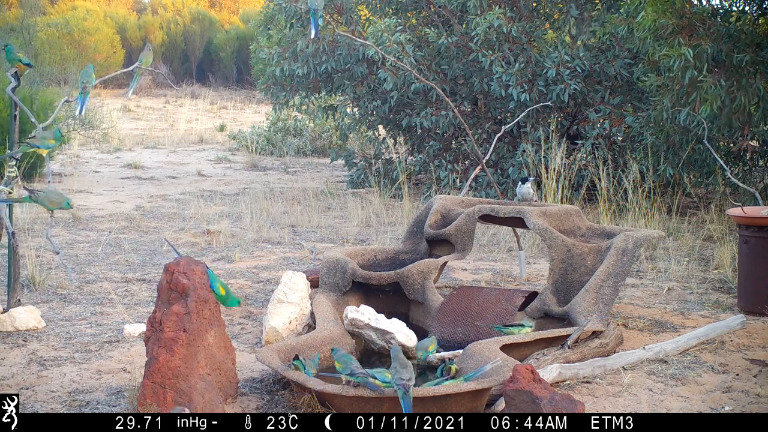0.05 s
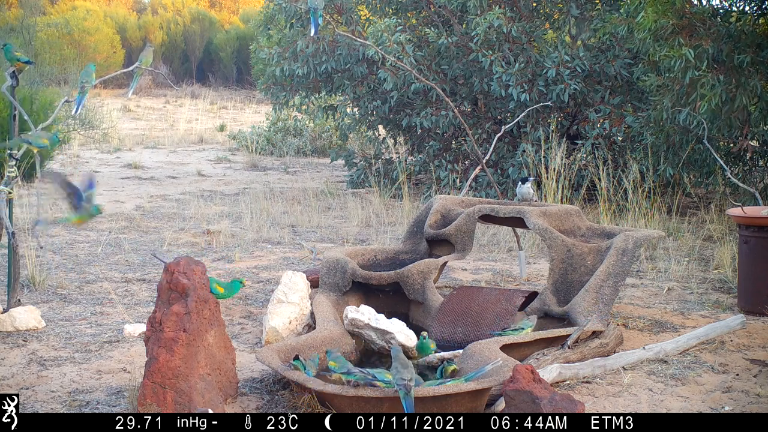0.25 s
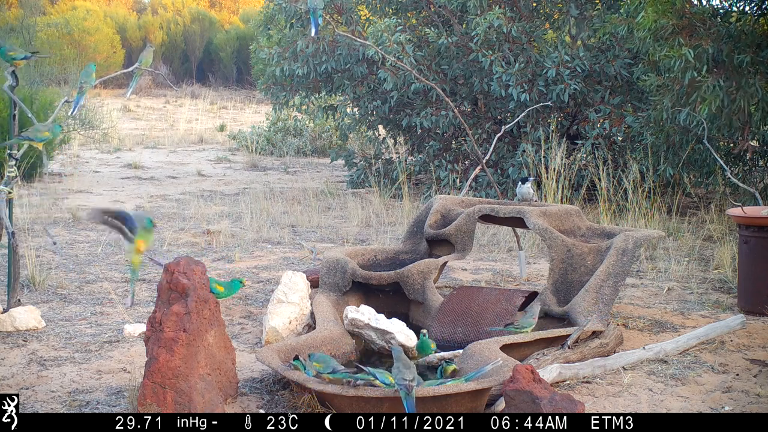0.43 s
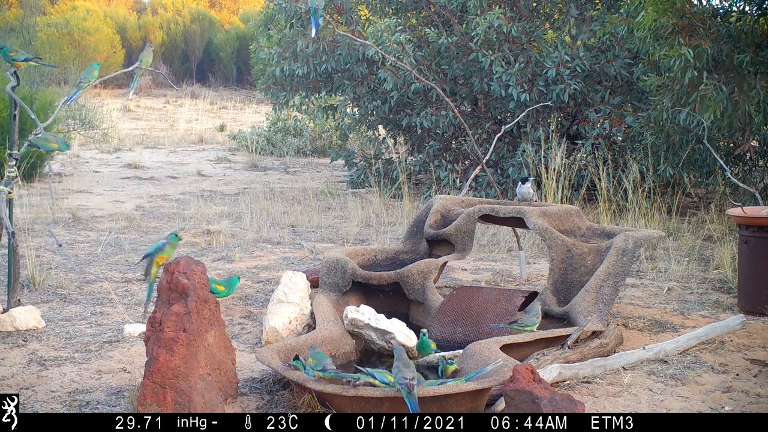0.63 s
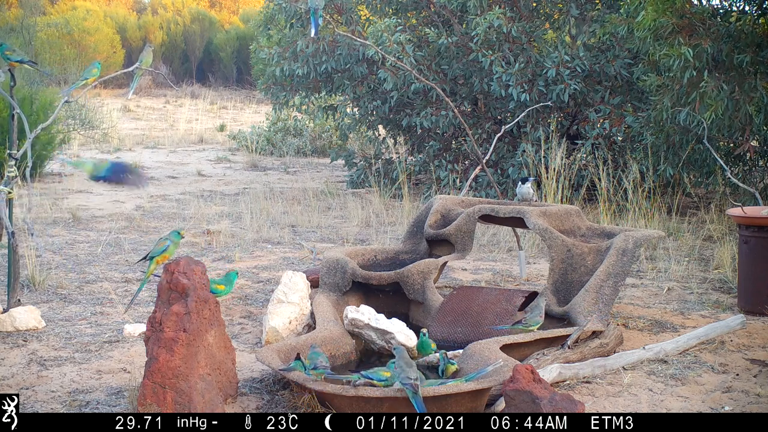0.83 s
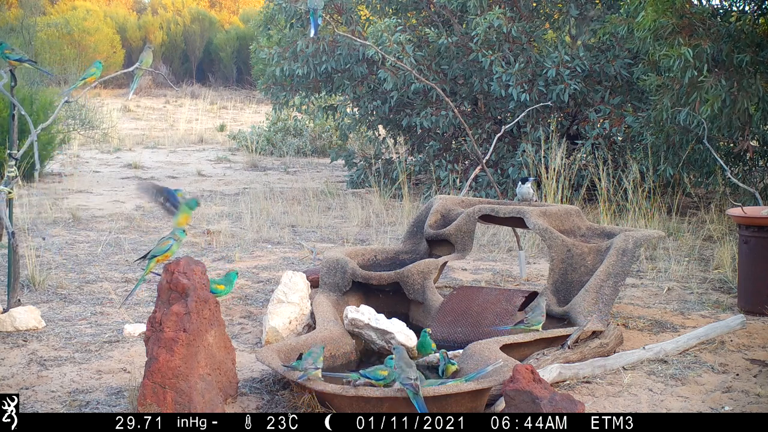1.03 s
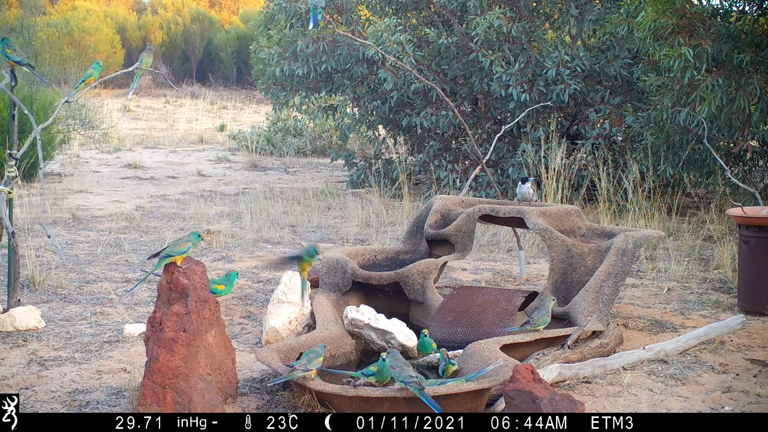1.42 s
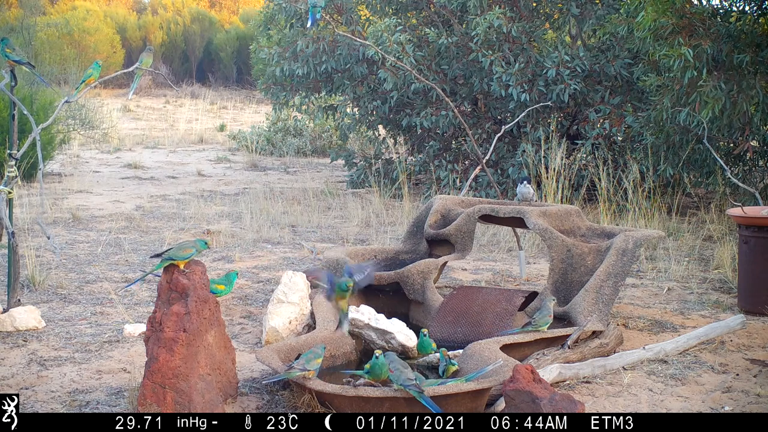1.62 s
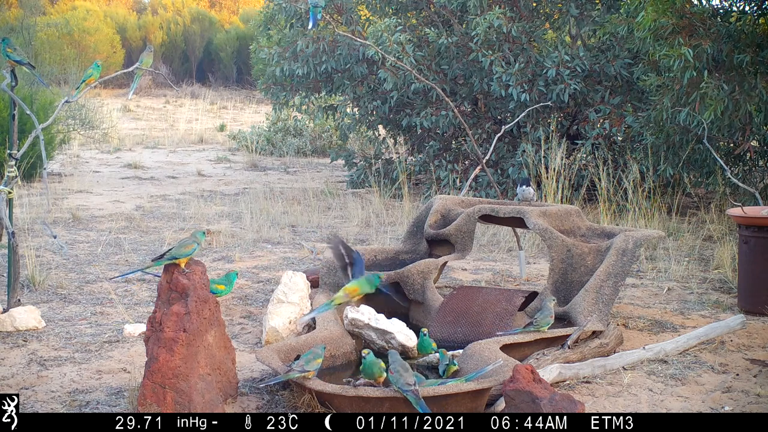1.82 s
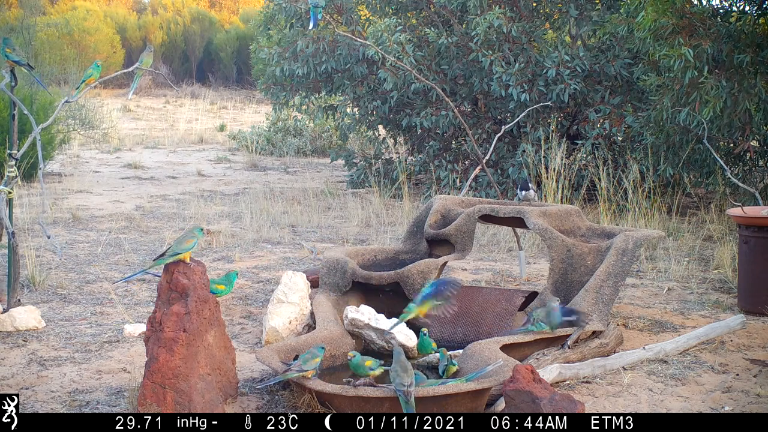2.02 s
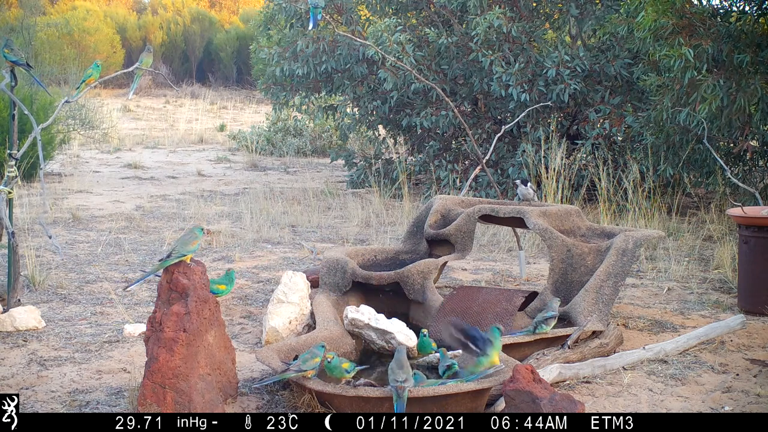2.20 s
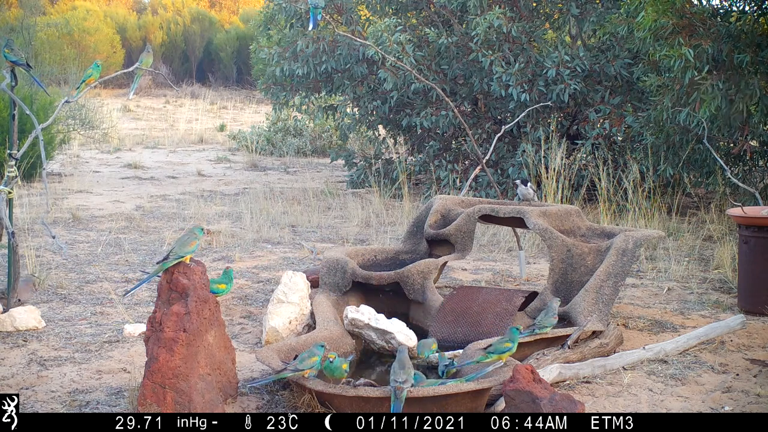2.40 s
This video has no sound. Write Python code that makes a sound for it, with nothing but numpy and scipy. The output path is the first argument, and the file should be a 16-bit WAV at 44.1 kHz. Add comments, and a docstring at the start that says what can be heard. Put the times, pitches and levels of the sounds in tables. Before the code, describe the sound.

One short, clear warbling bird whistle over small birds' soft chirps, taps and wing flutters.

```python
"""Soft open air and a camera's thin electronic whine run throughout.
At once a bird in dry scrub whistles one quick, warbling phrase; near 0.18 s it catches in a rasp
while the other side of its syrinx scoops below. The phrase ends faintly by 0.6 s.
Smaller birds give falling chirps during and after it, thinning out past 1 s.
Their flutters and taps about a water dish fill the rest."""
import sys
import numpy as np
from scipy import signal
from scipy.fft import rfft, irfft, next_fast_len
from scipy.io import wavfile
from scipy.ndimage import uniform_filter1d, map_coordinates

SR = 44100
rng = np.random.default_rng(int(sys.argv[2]) if len(sys.argv) > 2 else 0)


def transcribe(signal):
    """Save signal, clipped to [-1, 1], as a 16-bit WAV file at the path in sys.argv[1]."""
    frames = np.atleast_2d(signal).T
    limited = np.clip(frames, -1, 1)
    pcm = np.round(limited * 32767).astype(np.int16)
    wavfile.write(sys.argv[1], SR, pcm)


N = 112454
EDGE_S = .002  # fade of whistle and scoop


def amp(db):
    return 10 ** (np.asarray(db) / 20)


def unit(x):
    return x / np.sqrt(np.mean(x ** 2) + 1e-20)


def clock():
    return np.arange(N) / SR


def along(points, hz):
    """Interpolate (frequency [Hz], value) points on a log axis."""
    knots_hz, values = np.transpose(points)
    return np.interp(np.log(hz + 1), np.log(knots_hz + 1), values)


def wobble(rate_hz):
    """Smooth random curve, rate_hz knots a second."""
    return map_coordinates(rng.standard_normal(int(N * rate_hz / SR) + 4), [clock() * rate_hz])


def filtered(x, response):
    """Apply the gain response(hz)."""
    size = next_fast_len(N + SR // 2)
    return irfft(rfft(x, size) * response(np.fft.rfftfreq(size, 1 / SR)), size)[:N]


def noise(response):
    """Coloured noise, rms 1."""
    return unit(filtered(rng.standard_normal(N), response))


def band(centre_hz, width_oct):
    """Bell-shaped noise band, rms 1."""
    return noise(lambda hz: np.exp(-(np.log2((hz + 1) / centre_hz) / width_oct / 2) ** 2))


def swell(peak_s, sigma_s):
    """Gaussian envelope, peak 1."""
    return np.exp(-.5 * ((clock() - peak_s) / sigma_s) ** 2)


def electronics():
    """Camera hiss and a thin whine that flips polarity at a steady rate."""
    # brief crossfades toward a higher pitch (time [s], sigma [s])
    lifts = [(1.589, 0.007), (1.634, 0.0064)]
    whine_hz, lift_hz, flip_cycle_hz = 7796, 8170, 59.53
    whine_db, hiss_db = -80.8, -86.5
    t = clock()
    polarity = np.clip(32 * np.sin(np.pi * flip_cycle_hz * (t - .529)), -1, 1)
    lift = 0.57 * sum(swell(at_s, sigma_s) for at_s, sigma_s in lifts)
    whine = (1 - lift) * np.sin(2 * np.pi * whine_hz * t) + lift * np.sin(2 * np.pi * lift_hz * t)
    return amp(whine_db) * np.sqrt(2) * polarity * whine + amp(hiss_db) * rng.standard_normal(N)


def air():
    """Steady rush of open country, swaying slightly in level."""
    # rush spectrum (frequency [Hz], relative level [dB])
    spectrum = [(25, -17.5), (80, -12.5), (154, -7.5), (330, -3), (600, -1.5), (1100, -1.5), (2100, -5.5),
                (3170, -13), (3700, -18.5), (4400, -23), (5200, -29), (6200, -34), (7500, -42),
                (10000, -73.5)]
    level_db, sway_db = -59, 0.49
    rush = noise(lambda hz: amp(along(spectrum, hz)))
    return amp(level_db + sway_db * wobble(10)) * rush


def scrub(x):
    """Diffuse tail scattered back by the bushes."""
    t60_s, build_s = 0.6, .012
    t = np.arange(SR // 2) / SR
    tail = rng.standard_normal(len(t)) * amp(-60 * t / t60_s) * (1 - np.exp(-t / build_s))
    return signal.fftconvolve(x, tail / np.linalg.norm(tail))[:N]


def flutters():
    """Soft, grainy puffs of feathers."""
    # wing strokes and rustles (time [s], sigma [s], level [dB], centre [Hz], width [oct])
    strokes = [(0.069, 0.013, -55, 2300, 0.36), (.8, .012, -66, 4160, 0.34),
               (1.023, 0.08, -62.5, 1210, 0.6), (1.203, 0.0073, -64.5, 2200, 0.7),
               (1.255, 0.01, -65, 2400, 0.66), (1.59, 0.0081, -52.5, 355, 0.16),
               (1.607, 0.031, -64, 920, 0.84), (1.932, 0.017, -62.5, 1700, 0.61),
               (2.043, .006, -56.5, 1080, 0.73), (2.086, .009, -65, 2700, 0.58),
               (2.231, 0.009, -52, 700, 0.73), (2.258, 0.0035, -52, 2020, 0.44),
               (2.337, 0.012, -62, 2900, .55), (2.412, 0.0045, -55, 960, 0.54)]
    grain = unit(amp(0.94 * wobble(500)))
    return grain * sum(amp(db) * swell(at_s, sigma_s) * band(hz, width_oct)
                       for at_s, sigma_s, db, hz, width_oct in strokes)


def taps():
    """Beaks and claws tick: a short ring and a small crack."""
    # strikes (time [s], level [dB], ring [Hz], t60 [s], crack re ring [dB])
    strikes = [(.065, -52, 3300, .005, -8), (.948, -37, 1850, .005, -14), (.9495, -40, 950, .005, -14),
               (1.447, -45, 1500, .005, -14), (2.036, -34, 2400, .0035, -8), (2.224, -42, 1300, .006, -12),
               (2.226, -56, 595, .1, -30), (2.341, -46, 1900, .008, -12)]
    out, crack = np.zeros(N), band(centre_hz=1700, width_oct=0.77)
    for at_s, db, hz, t60_s, crack_db in strikes:
        age_s = np.maximum(clock() - at_s, 0)
        envelope = amp(db - 60 * age_s / t60_s) * (1 - np.exp(-age_s / .0001))
        out += envelope * (np.sin(2 * np.pi * hz * age_s) + amp(crack_db) * crack)
    return out


def dish():
    """Taps and flutters at the water dish, dulled by distance."""
    # distance filter (frequency [Hz], gain [dB])
    dulling = [(60, -24.5), (250, -1.5), (3000, 1), (5000, -6.5), (7000, -11), (10000, -20.5)]
    return filtered(taps() + flutters(), lambda hz: amp(along(dulling, hz)))


def chirps():
    """Small birds: each chirp arches over its top and dives; a near surface echoes it."""
    # chirps (time of top [s], top [Hz], pitch after fall [Hz], fall [s], level at ref_hz [dB])
    calls = [(0.084, 4105, 2300, 0.017, -56.5), (.202, 5000, 3500, 0.011, -59.5),
             (.317, 3630, 2170, 0.034, -55), (0.517, 3910, 2170, 0.032, -56),
             (.630, 4200, 2364, 0.016, -55), (.710, 3320, 2350, 0.014, -59.5),
             (.721, 4540, 2900, 0.019, -57.5), (0.79, 4610, 2970, .018, -55),
             (0.901, 4800, 2750, 0.02, -58), (0.973, 4550, 2850, 0.023, -56.5),
             (1.305, 3240, 2860, 0.015, -64.5), (1.599, 2050, 1717, 0.016, -73),
             (1.775, 2140, 1950, .014, -72.5)]
    ref_hz, tilt_db_per_oct = 2980, -17.5
    echo_s, echo_db = .0105, -10
    t, out = clock(), np.zeros(N)
    for top_s, top_hz, low_hz, fall_s, db in calls:
        progress = np.clip((t - top_s) / fall_s, -0.39, 1.15)  # 0 at top_hz, 1 at low_hz
        hz = top_hz * (low_hz / top_hz) ** (np.abs(progress) ** 1.7)
        gate = np.clip(np.minimum(progress - progress[0], progress[-1] - progress) / 0.39, 0, 1)
        level_db = db + tilt_db_per_oct * np.log2(hz / ref_hz)
        out += gate * amp(level_db) * np.sin(2 * np.pi * np.cumsum(hz) / SR)
    return np.sqrt(2) * filtered(out, lambda hz: 1 + amp(echo_db) * np.exp(-2j * np.pi * hz * echo_s))


def rasp():
    """Fast-pulsing noise where the whistle breaks between syllables."""
    # rough bursts (time [s], sigma [s], level [dB])
    bursts = [(0.147, 0.0023, -48.5), (0.18, 0.0055, -52), (0.191, 0.0047, -45.5)]
    # rasp spectrum (frequency [Hz], relative level [dB])
    spectrum = [(300, -38.5), (800, -24.5), (1200, -17.5), (1500, -5.5), (2050, 1), (2450, -13),
                (3300, -12.5), (4300, -35), (7000, -39.5), (10000, -65)]
    pulse_hz, depth = 380, 0.2
    pulses = 1 + depth * np.sin(2 * np.pi * pulse_hz * clock())
    envelope = sum(amp(db) * swell(at_s, sigma_s) for at_s, sigma_s, db in bursts)
    return envelope * unit(pulses * noise(lambda hz: amp(along(spectrum, hz))))


def scoop():
    """The other side of the syrinx dips and rises, beating against the whistle."""
    # lower voice contour (time [s], pitch [Hz], level [dB])
    contour = [(.171, 1503, -60), (0.178, 1218, -51.5), (.183, 1030, -49), (0.188, 1224, -46),
               (0.196, 1408, -49.5), (0.201, 1485, -53)]
    jitter, octave_db = 0.028, -12
    t = clock()
    knots_s, hz, db = np.transpose(contour)
    pitch_hz = np.interp(t, knots_s, hz) * (1 + jitter * wobble(500))
    phase = 2 * np.pi * np.cumsum(pitch_hz) / SR
    gate = np.clip(np.minimum(t - knots_s[0], knots_s[-1] - t) / EDGE_S, 0, 1)
    return gate * amp(np.interp(t, knots_s, db)) * (np.sin(phase) + amp(octave_db) * np.sin(2 * phase))


def whistle():
    """Main bird: a nearly pure tone whose faint overtones flicker and grow with loudness."""
    # one contour per syllable (time [s], pitch [Hz], level [dB])
    syllables = [
        [(0.074, 1777, -54), (0.081, 1646, -49), (0.088, 1655, -51), (0.093, 1674, -64), (0.099, 1700, -40),
         (0.107, 1705, -33), (0.114, 1661, -37), (0.123, 1764, -37), (0.129, 1743, -45), (0.136, 1760, -43),
         (0.143, 1850, -56)],
        [(0.143, 1850, -56), (0.147, 1825, -39), (0.156, 1745, -32), (0.165, 1713, -29), (0.172, 1726, -33),
         (0.1755, 1767, -40), (0.178, 1953, -54)],
        [(0.178, 1953, -54), (0.186, 1645, -42), (0.196, 1637, -34), (0.2, 1681, -27), (0.208, 1721, -26),
         (0.214, 1730, -30), (0.224, 1746, -39), (0.232, 1808, -51), (0.244, 1771, -53)],
        [(0.244, 1771, -53), (0.255, 1709, -46), (0.265, 1737, -38), (0.28, 1763, -33), (0.293, 1932, -36),
         (0.299, 1912, -40), (0.306, 1760, -47)],
        [(0.306, 1760, -47), (0.311, 1778, -41), (0.316, 1903, -42), (0.32, 1837, -40), (0.327, 1795, -35),
         (0.333, 1884, -33), (0.341, 1932, -33), (0.347, 1887, -29), (0.36, 1818, -28), (0.372, 1778, -27),
         (0.381, 1806, -35), (0.389, 1705, -60)],
        [(0.497, 1726, -60), (0.504, 1765, -44), (0.51, 1591, -59), (0.517, 1690, -54), (0.528, 1609, -52),
         (0.539, 1830, -55), (0.555, 1791, -57), (0.566, 1744, -55), (0.573, 2026, -71)],
    ]
    # brightness per syllable (overtone gain [dB])
    brightness = [-2, 1, -2, -9, -11, -4]
    # overtones (multiple of pitch, base level re fundamental [dB])
    overtones = [(2, -32.5), (3, -47), (4, -51.5)]
    jitter, shimmer_db, flicker_db = .004, .3, 6
    full_voice_db, growth_db_per_db = -23, 0.28
    t, gate, bright_db = clock(), np.zeros(N), np.zeros(N)
    for contour, gain_db in zip(syllables, brightness):
        inside = np.clip(np.minimum(t - contour[0][0], contour[-1][0] - t) / EDGE_S + .5, 0, 1)
        gate += inside
        bright_db += gain_db * inside
    knots_s, hz, db = np.transpose(sorted(tuple(row) for contour in syllables for row in contour))
    level_db = np.interp(t, knots_s, db) + shimmer_db * wobble(250)
    pitch_hz = np.interp(t, knots_s, hz) * (1 + jitter * wobble(300))
    phase = 2 * np.pi * np.cumsum(pitch_hz) / SR
    upper = sum(amp(base_db + flicker_db * wobble(40)) * np.sin(k * phase) for k, base_db in overtones)
    voice = np.sin(phase) + upper * amp(bright_db + growth_db_per_db * (level_db - full_voice_db))
    envelope = uniform_filter1d(np.minimum(gate, 1) * amp(level_db), size=66)
    return np.sqrt(2) * envelope * voice


def scene():
    """Birds over open air, mono; the chirps scatter most in the scrub."""
    near_send_db, far_send_db = -28, -15
    near = whistle() + scoop() + rasp() + dish()
    far = chirps()
    tail = scrub(amp(near_send_db) * near + amp(far_send_db) * far)
    return (near + far + tail + air())[None]


def record(dry):
    """The camera adds its own noise and cuts everything above its band limit."""
    limit_hz = 15720
    return filtered(dry[0] + electronics(), lambda hz: hz < limit_hz)[None]


dry = scene()
out = record(dry)
transcribe(out)
```